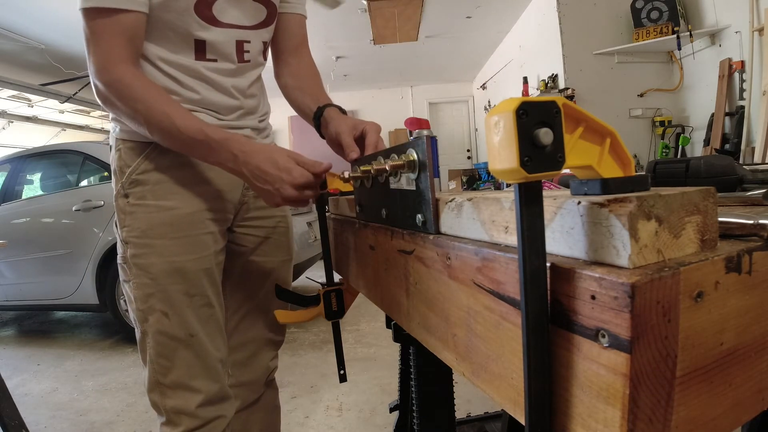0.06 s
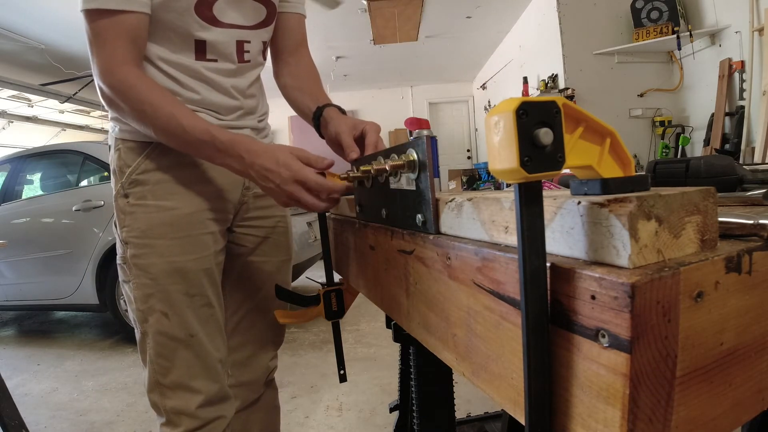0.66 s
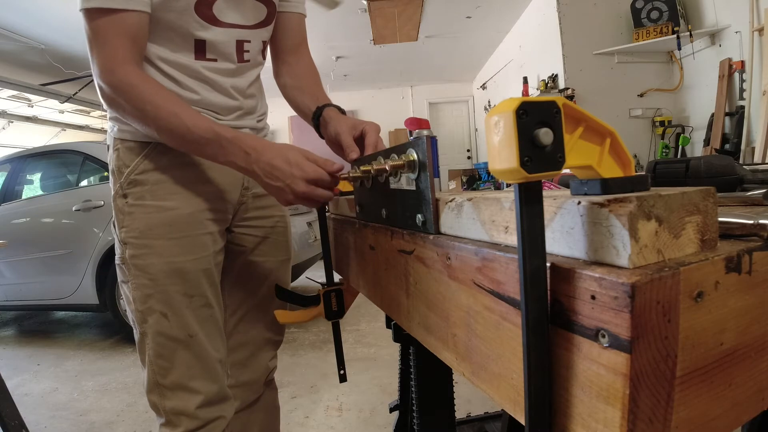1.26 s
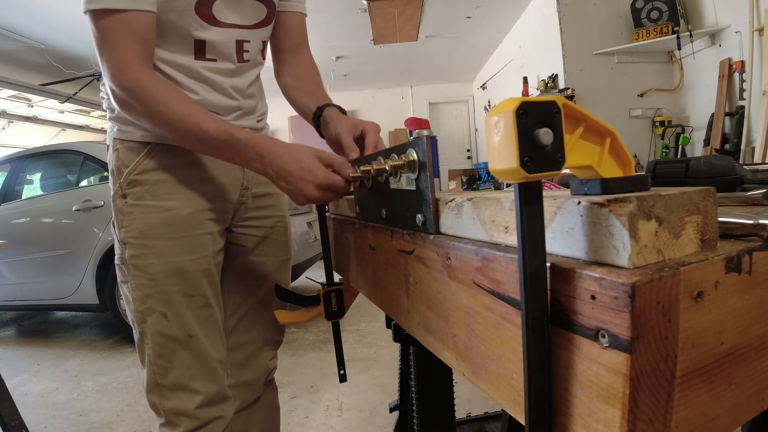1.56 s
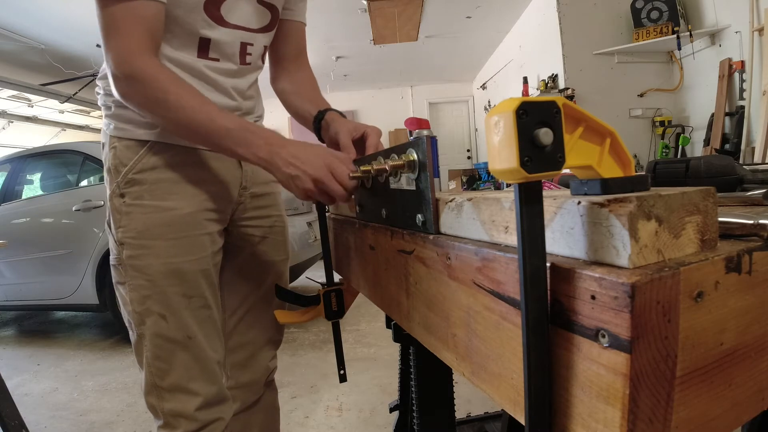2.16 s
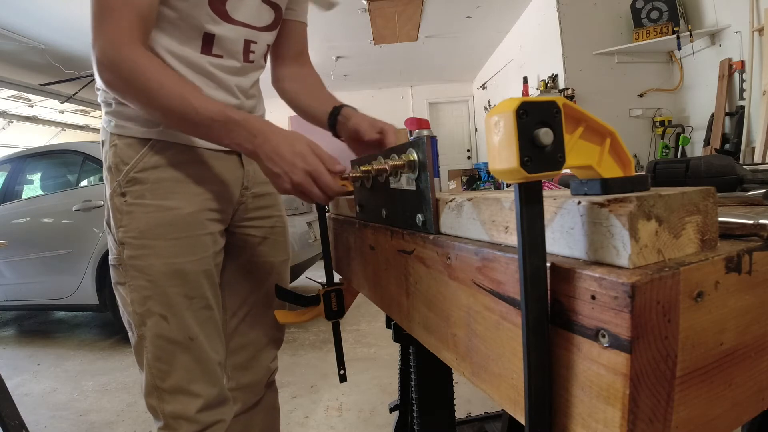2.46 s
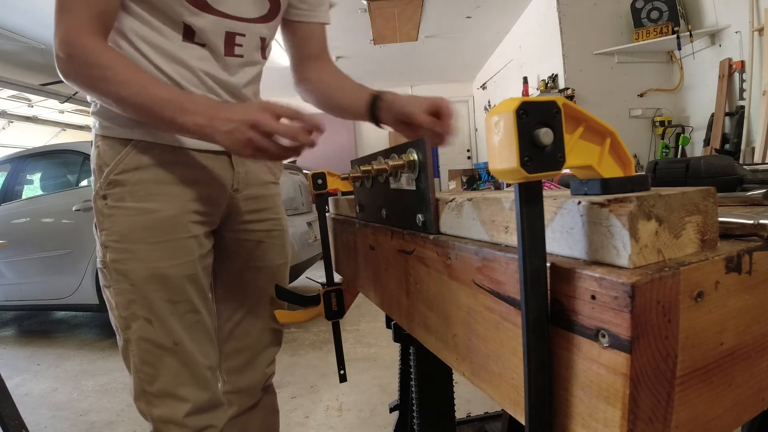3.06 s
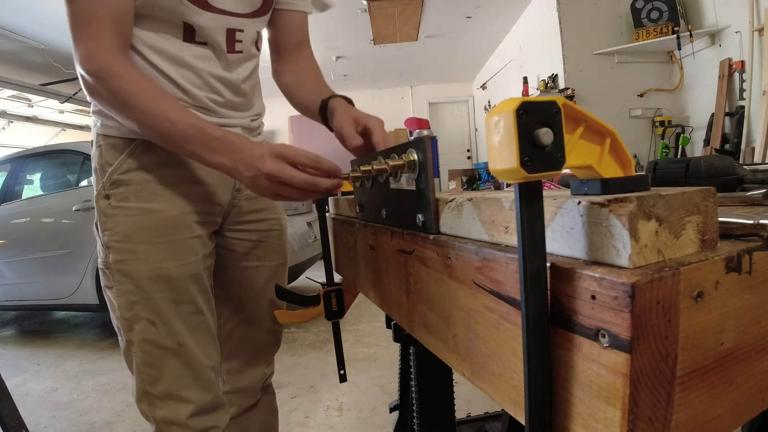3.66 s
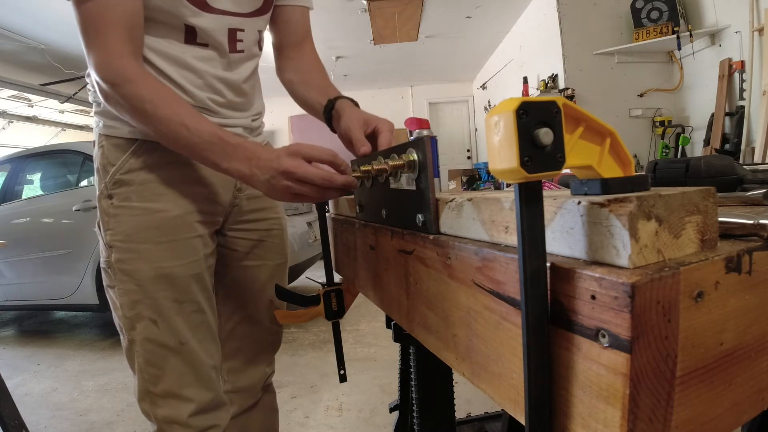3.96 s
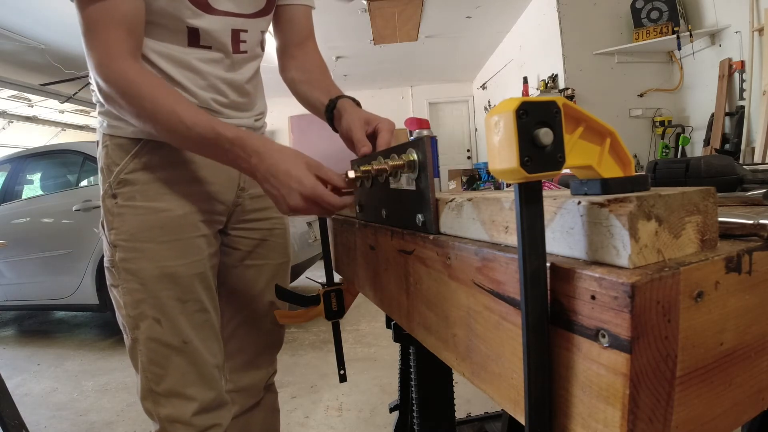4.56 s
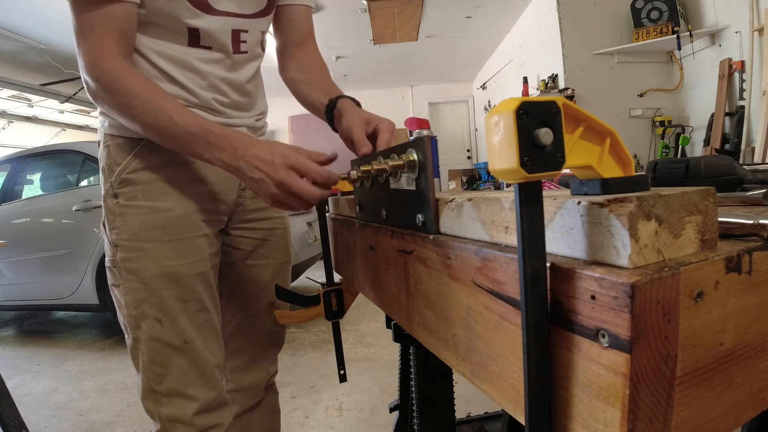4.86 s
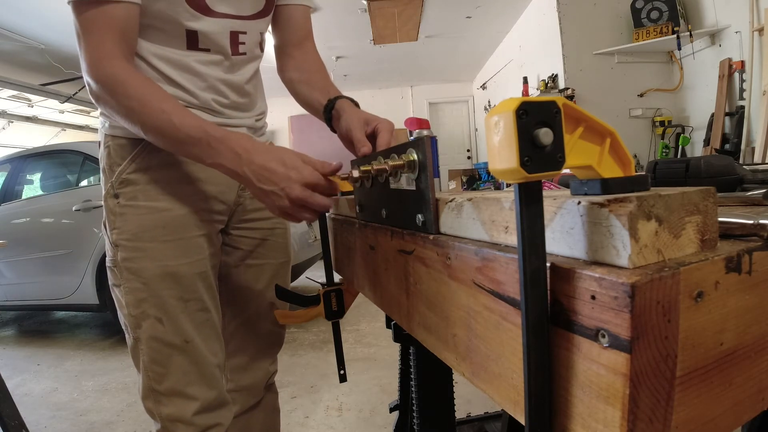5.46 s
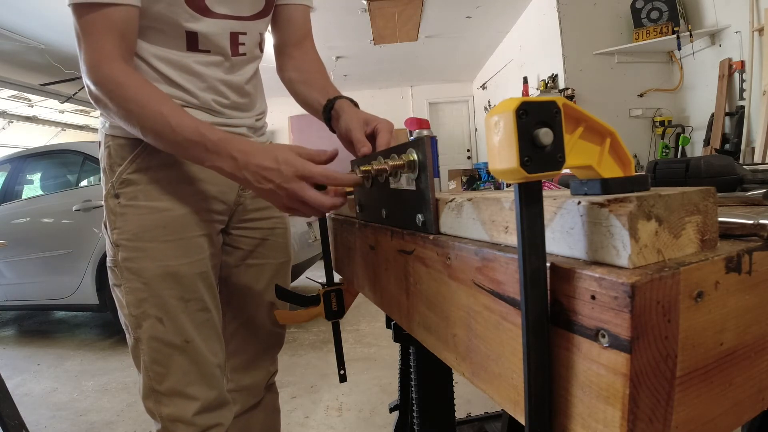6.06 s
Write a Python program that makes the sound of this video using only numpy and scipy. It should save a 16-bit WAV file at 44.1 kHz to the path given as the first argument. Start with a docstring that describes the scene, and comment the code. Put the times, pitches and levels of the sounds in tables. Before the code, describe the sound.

From the start, a bolt is turned by hand in a steel plate clamped to a wooden bench. About four twists a second each bring a click, a scrape of threads and a bouncing, ringing rattle, while a loose washer jingles high above. This thins out after 1.6 seconds. From about 2 to 2.8 seconds a low hum swells softly and sleeves rustle. Around 2.9 seconds a nut knocks dully and slides as it is picked off the bench, followed by a few faint tinks. Light clicks and scrapes start on a second bolt near 3.9 seconds. From 4.8 seconds until the end, at about 6.4 seconds, it clacks and rattles loudly with each twist, ringing the plate and thumping slightly through the bench. Everything is close, with the short echo of a bare-walled garage over faint room tone.

```python
"""Bolts in a steel plate

Bolts with loose washers are turned by hand in a steel plate clamped to a wooden garage bench.
Each twist opens with a click, the threads scrape, and the bolt knocks and bounces in its hole,
ringing the plate; one washer keeps jingling. Between the two bolts a low hum swells, sleeves
rustle and a nut is picked off the bench. Bare walls ring on."""
import sys
import numpy as np
from scipy import signal
from scipy.fft import rfft, irfft
from scipy.io import wavfile
from scipy.ndimage import uniform_filter1d

SR = 44100
rng = np.random.default_rng(int(sys.argv[2]) if len(sys.argv) > 2 else 0)


def int16_out(signal):
    """Quantize to a 16-bit WAV file."""
    q = np.round(np.clip(np.atleast_2d(signal).T, -1, 1) * 32767)
    wavfile.write(sys.argv[1], SR, q.astype(np.int16))


N = 277785
T = np.arange(N) / SR
SECOND_BOLT_S = 3.0  # the hands move on to the second bolt


def undb(db):
    """Decibels to gain."""
    return 10 ** (np.asarray(db) / 20)


def unit(x):
    """Scale to rms 1."""
    return x / np.sqrt(np.mean(x ** 2) + 1e-20)


def fade(t, t60):
    """Exponential decay, 60 dB down after t60 seconds."""
    return np.exp(-np.log(1000) * t / t60)


def over_hz(points, hz):
    """Read (Hz, value) points on a log-frequency axis."""
    f, value = np.transpose(points)
    return np.interp(np.log(hz + 1e-3), np.log(f), value)


def add(track, s, sound):
    """Mix a sound into the track at time s."""
    i = max(int(s * SR), 0)
    track[i:i + len(sound)] += sound[:N - i]


def convolve(x, response):
    """Play x through an impulse response."""
    return signal.fftconvolve(x, response)[:len(x)]


def cut(x, hz, kind, order=2):
    """Low-pass or high-pass."""
    return signal.sosfilt(signal.butter(order, min(hz, .45 * SR), kind, fs=SR, output="sos"), x)


def wobble(hz):
    """Random modulation of rms 1, rolling off above hz."""
    return unit(cut(rng.standard_normal(N), hz, "low"))


def swells(rows, attack_s, t60):
    """Envelope of (start, end, dB) gestures: each rises, holds and dies away."""
    return sum(undb(db) * (1 - np.exp(-np.maximum(T - start, 0) / attack_s)) ** 2
               * fade(np.maximum(T - end, 0), t60) for start, end, db in rows)


def colour(points, size=2048):
    """Minimum-phase response of unit energy from a (Hz, dB) EQ curve."""
    gain = undb(over_hz(points, np.fft.rfftfreq(size, 1 / SR)))
    cepstrum = irfft(np.log(gain))
    cepstrum[1:size // 2] *= 2
    cepstrum[size // 2 + 1:] = 0
    response = irfft(np.exp(rfft(cepstrum)))
    return response / np.linalg.norm(response)


def modes(table, size=16384):
    """Ring of unit energy from (Hz, width, dB) resonances."""
    t = T[:size]
    ring = sum(undb(db) * width * np.exp(-np.pi * width * t) * np.cos(2 * np.pi * hz * t)
               for hz, width, db in table)
    return ring / np.linalg.norm(ring)


def slips(per_s, spread_db):
    """Stick-slip friction: tiny impacts at random times."""
    sizes = undb(spread_db * np.clip(rng.standard_normal(N), -2, 2)) * rng.choice([-1, 1], N)
    return unit(sizes * (rng.random(N) < per_s / SR))


def contact(t60, chatter, size=1024):
    """One blow of unit energy: a first touch, then fast dying chatter."""
    push = rng.standard_normal(size) * fade(T[:size], t60)
    push *= chatter / np.linalg.norm(push)
    push[0] += 1
    return push / np.linalg.norm(push)


def contact_point(shape, patchy_db):
    """Every point of contact favours other resonances around a general (Hz, dB) shape."""
    hz = np.geomspace(400, 17000, 40)
    favour = over_hz(shape, hz) + patchy_db * np.clip(rng.standard_normal(len(hz)), -2, 2)
    return colour(np.column_stack([hz, favour]), size=512)


# room tone EQ: (frequency [Hz], relative level [dB])
AIR_EQ = [(12, -50.5), (20, -10.5), (84, -7.5), (124, -12.5), (139, -17), (270, -23.5), (693, -27),
          (1680, -30), (1830, -31.5), (4080, -39.5), (15000, -49)]


def still_air(level_db=-49.5):
    """A faint, dark bed of noise."""
    return undb(level_db) * convolve(rng.standard_normal(N), colour(AIR_EQ, size=8192))


# reverb decay of the garage: (frequency [Hz], t60 [s])
WALL_DECAY = [(100, 0.57), (700, 0.45), (2000, 0.44), (5000, 0.52), (13000, 0.24)]


def garage(x, wet_db, build_s=0.0016, predelay_s=0.00024):
    """Bare walls return a dense tail that dies soonest in the top octave."""
    t = T[:SR * 3 // 4]
    hz, noise = np.fft.rfftfreq(len(t), 1 / SR), rfft(rng.standard_normal(len(t)))
    tail = 0
    for centre, t60 in WALL_DECAY:
        band = over_hz([(f, f == centre) for f, _ in WALL_DECAY], hz)
        tail += irfft(noise * band, len(t)) * fade(t, t60)
    tail *= 1 - np.exp(-np.maximum(t - predelay_s, 0) / build_s)
    return x + undb(wet_db) * convolve(x, tail / np.linalg.norm(tail))


# swells of the low hum: (start [s], end [s], relative level [dB])
HUM_SWELLS = [(1.95, 2.15, -55), (2.185, 2.36, -34), (2.395, 2.52, -32), (2.655, 2.755, -39)]


def hum(hz=64.6, gain_db=5, waver=0.029, overtone_db=-27):
    """A nearly pure low tone comes and goes, wavering a little in pitch."""
    phase = 2 * np.pi * np.cumsum(hz * (1 + waver * wobble(hz=5.1))) / SR
    tone = np.sqrt(2) * (np.sin(phase) + undb(overtone_db) * np.sin(2 * phase))
    return undb(gain_db) * swells(HUM_SWELLS, attack_s=0.013, t60=0.12) * tone


# moves of hands and sleeves: (start [s], end [s], relative level [dB])
RUSTLE_MOVES = [(1.99, 2.1, -53), (2.19, 2.52, -45.5), (2.67, 2.76, -49.5), (3.1, 3.2, -60)]
# their soft tone: (frequency [Hz], relative level [dB])
RUSTLE_EQ = [(88, -33.5), (150, -2.5), (318, 1), (357, -5.5), (742, -10), (883, -12), (1320, -11),
             (3820, -23), (15000, -32)]


def rustle(gain_db=-1):
    """Hands and sleeves brush softly; the fingers rub unevenly."""
    pressure = undb(gain_db + 0.59 * wobble(hz=32))
    friction = convolve(slips(per_s=2500, spread_db=0), colour(RUSTLE_EQ))
    return swells(RUSTLE_MOVES, attack_s=0.0055, t60=0.33) * pressure * friction


# nut on the bench: (time [s], relative level [dB], tick offset [dB])
NUT_KNOCKS = [(2.887, -24.5, -24), (2.924, -28, -13), (2.947, -12.5, -35), (2.969, -25, 14.5),
              (3.003, -23.5, -30), (3.037, -28, -19)]
# resonances of the wood: (frequency [Hz], width [Hz], relative level [dB])
WOOD_MODES = [(202, 97, -22), (600, 49, 7), (982, 45, 9), (1050, 70, -20), (1360, 50, -8), (1385, 86, 9.5),
              (2435, 64, 6.5), (2600, 75, -23)]
# fingers push, then drag the nut: (start [s], end [s], level [dB])
NUT_SLIDES = [(2.9, 2.935, -38.5), (2.888, 3.04, -42.5)]
# tone of the drag: (frequency [Hz], relative level [dB])
SLIDE_EQ = [(59, -28), (100, 4.5), (192, -2), (383, -20), (780, -10), (1050, -2.5), (1880, -7.5),
            (2270, -1.5), (4090, -17.5), (9260, -15.5), (15000, -42)]


def nut(knock_db=16, tick_db=2):
    """A nut knocks and slides as it is picked up; wood gives way, so the knock is dull."""
    taps, ticks = np.zeros(N), np.zeros(N)
    for s, db, treble in NUT_KNOCKS:
        add(taps, s, undb(db + knock_db) * contact(t60=0.0039, chatter=0.19))
        add(ticks, s, undb(db + treble + tick_db) * contact(t60=0.0096, chatter=2.2))
    knocks = cut(convolve(taps, modes(WOOD_MODES)), 3200, "low", order=4)
    ticks = cut(cut(ticks, 2000, "high"), 10300, "low")
    friction = convolve(slips(per_s=9000, spread_db=4.5), colour(SLIDE_EQ))
    return knocks + ticks + swells(NUT_SLIDES, attack_s=0.0055, t60=.12) * friction


# light touches of small parts: (time [s], pitch [Hz], relative level [dB], t60 [s])
PART_TINKS = [(2.41, 5290, -60.5, 0.42), (3.128, 6600, -56.5, 0.47), (3.232, 4900, -57.5, 0.44),
              (3.77, 5150, -58.5, 0.9), (3.879, 10500, -59.5, 0.2), (4.005, 9250, -41.5, 0.026)]


def tinks(gain_db=-8, spread=0.083, attack_s=0.0017):
    """Small parts ring in close clusters of high partials."""
    out, t = np.zeros(N), T[:SR // 2]
    for s, hz, db, t60 in PART_TINKS:
        partials = hz * (1 + spread * rng.standard_normal(12))
        cluster = sum(np.sin(2 * np.pi * (f * t + rng.random())) for f in partials)
        add(out, s, undb(db + gain_db) * fade(t, t60) * (1 - np.exp(-t / attack_s)) * cluster)
    return out


# the washer's ring: (frequency [Hz], width [Hz], relative level [dB])
WASHER_MODES = [(8790, 14, 0), (8828, 14, 0)]
# the washer is shaken: (start [s], end [s], relative level [dB])
WASHER_SHAKES = [(.078, .2, -52), (.359, .37, -47), (.566, .655, -18), (.8, 1.0, -27.5),
                 (1.083, 1.125, -21.5), (1.298, 1.37, -26.5), (1.555, 1.57, -32)]


def washer(gain_db=-9):
    """A loose washer chatters on its bolt and rings with two beating modes."""
    ring = convolve(slips(per_s=560, spread_db=2), modes(WASHER_MODES))
    # even out the ring: with little play, the washer follows the shaking closely
    swing = np.sqrt(np.abs(uniform_filter1d(ring ** 2, size=2200)) + 1e-3)
    return undb(gain_db) * swells(WASHER_SHAKES, attack_s=0.0017, t60=0.48) * ring / swing


# twists of a bolt, levels relative: (start [s], end [s], click [dB], scrape [dB], scrape swell [dB])
TWIST_CUES = [(0, 0.059, -26, -33.5, -11), (.078, 0.319, -5, -26.5, -6.5), (.322, 0.379, -1, -25, 9),
              (.564, 0.651, -16, -25.5, -9), (0.795, 1.047, -0.5, -31.5, -18),
              (1.048, 1.143, -4, -22.5, 10), (1.295, 1.373, -9, -25, -4.5), (1.53, 1.68, -11.5, -29.5, 4.5),
              (1.868, 1.987, -20.5, -33.5, 6.5), (3.879, 4.012, -18, -42.5, 22.5),
              (4.146, 4.258, -24, -45, -5), (4.32, 4.531, -29.5, -34, 16),
              (4.604, 4.692, -24, -33.5, -11.5), (4.793, 4.852, -22, -31.5, 10),
              (4.852, 4.97, -32, -29, -6.5), (5.063, 5.1, -12, -27.5, -1), (5.277, 5.434, -15, -31, -5),
              (5.512, 5.602, -12.5, -24, 2), (5.739, 5.813, -3, -23.5, 8), (5.968, 6.128, -9, -28.5, -6),
              (6.18, 6.296, -5.5, -32.5, -22)]


def scrapes(gain_db=-6, catch_db=2.5, firm_db=-28):
    """Threads grind, catching and letting go many times in each twist; firm twists are brighter."""
    catches = unit(undb(catch_db * np.clip(wobble(hz=110), -2, 2)))
    grind = catches * slips(per_s=2500, spread_db=2)
    force = np.zeros(N)
    for start, end, _, db, swell in TWIST_CUES:
        squeak_db = 7 if start < SECOND_BOLT_S else -1
        bright_db = 0.27 * max(db - firm_db, 0)
        shape = [(5000, 0), (5750, squeak_db), (6600, bright_db - 5), (14000, bright_db - 12)]
        stroke = grind[int(start * SR):int(end * SR)]
        stroke = unit(signal.fftconvolve(stroke, contact_point(shape, patchy_db=3)))
        ramp_db = swell * np.linspace(-.5, .5, len(stroke))
        add(force, start, stroke * undb(gain_db + db + ramp_db))
    return cut(force, 250, "high")  # too light to shake the bench


# bolt against its hole: (time [s], relative level [dB], bounce length [s], relative treble [dB])
BOLT_KNOCKS = [(0.09, -9, .04, -38), (0.343, -0.5, .002, -26), (.359, 2.5, .006, -11),
               (0.569, -1.5, .014, -3.5), (0.616, -3.5, .003, -9), (0.631, -3, 0.017, -7.5),
               (.810, 2, .004, -2.5), (0.847, 2.5, 0.0016, -17), (0.898, -6.5, 0.0012, -55),
               (0.946, -7, 0.0091, -31), (1.007, -5, .002, -42), (1.083, -12, .002, 4),
               (1.093, -4.5, .009, -19), (1.12, 3, .006, -5), (1.344, 3.5, .007, -14.5),
               (1.359, -6, .002, -6), (1.549, -21, 0.0093, -36), (1.629, -13.5, .012, -37),
               (2.148, -28.5, 0.0026, -57), (2.213, -31, .014, -40), (3.767, -29, 0.0024, -36),
               (4.513, -15, .016, -40), (4.81, -4.5, .004, -16), (4.824, -3.5, .005, -11),
               (4.838, -4, .002, -25), (5.075, -4, .012, -7.5), (5.312, 3, 0.021, -4.5),
               (5.54, -6.5, .002, -12), (5.563, 2, 0.018, -6.5), (5.77, 1, 0.028, -5),
               (5.985, -4, 0.011, -5.5), (6.052, -4, 0.0016, -44), (6.099, 1, .016, -6),
               (6.189, -9, .003, -6)]


def blows(gap_s=.0066, scatter=.25, loss_db=0.74, full_rattle_s=0.015, click_treble_db=-28.5):
    """Cue list (s, dB, treble dB) of dull grip clicks, knocks and their weakening bounces."""
    hits = [(start, click, click_treble_db) for start, _, click, _, _ in TWIST_CUES]
    for s, db, lasts, treble in BOLT_KNOCKS:
        hits.append((s, db, treble))
        if lasts > gap_s:  # a lighter touch leads into a long rattle
            lead_db = -10 + 20 * np.log10(min(lasts / full_rattle_s, 1))
            hits.append((s - gap_s, db + lead_db, treble))
        gaps = gap_s * (1 + scatter * rng.uniform(-1, 1, 6))
        for k, delay in enumerate(np.cumsum(gaps), 1):
            share = min(lasts / gap_s - k + .5, 1)  # the last bounce is only partial
            if share > 0:
                hits.append((s + delay, db - k * loss_db + 20 * np.log10(share), treble))
    return hits


def clacks(body, hits, gain_db=8, attack_s=0.00027):
    """The bolt hits the side of its hole; hard contacts are bright, light ones are rounder."""
    force = np.zeros(N)
    for s, db, treble in hits:
        bass_db, top_db = -5 - 0.42 * db, treble + 18
        shape = [(700, bass_db), (1600, 0), (3800, 0), (6500, top_db / 2), (11000, top_db)]
        push = contact(t60=0.04 * undb(0.077 * db), chatter=3)  # strong blows chatter for longer
        push *= 1 - np.exp(-T[:len(push)] / attack_s)
        push = convolve(push, contact_point(shape, patchy_db=4.5))
        # each blow is levelled by the midrange ring it draws from the body
        mids = cut(cut(signal.fftconvolve(push, body), 1500, "high"), 4500, "low")
        add(force, s, undb(db + gain_db) * push / np.linalg.norm(mids))
    return force


# boom of the bench: (frequency [Hz], relative level [dB], t60 [s])
BENCH_MODES = [(136.9, -2.5, .28), (304, -3.5, .12), (405.3, -4, 0.23)]


def thumps(first_db=-29, second_db=-27, tight_s=5.3, grip_db_per_s=49, attack_s=0.0048, detune=.01):
    """Heavy, hard knocks boom through the clamp into the bench, more so as the second bolt tightens."""
    out, t = np.zeros(N), T[:SR // 2]
    for s, db, _, treble in BOLT_KNOCKS:
        slack_db = grip_db_per_s * max(tight_s - s, 0)
        grip_db = first_db if s < SECOND_BOLT_S else second_db - slack_db
        boom = 0
        for hz, mode_db, t60 in BENCH_MODES:
            pitch = hz * (1 + detune * rng.standard_normal())
            boom += undb(mode_db) * fade(t, t60) * np.sin(2 * np.pi * pitch * t)
        add(out, s, undb(grip_db + db + 0.2 * treble) * (1 - np.exp(-t / attack_s)) * boom)
    return out


# ring of the clamped plate with its bolts: (frequency [Hz], width [Hz], relative level [dB])
PLATE_MODES = [(337, 42, -8), (393.3, 19, 5), (473.5, 48, -2), (667, 100, -4), (780, 170, -3.5),
               (1096, 23, 3), (1314, 54, -7), (1420, 24, -5.5), (1580, 90, -13.5), (1923, 84, -3.5),
               (1867, 11, -7.5), (2153, 6.5, 0.5), (2600, 27, -5), (2290, 14, -18), (2430, 43, -4.5),
               (2830, 40, 0), (2890, 22, -19), (2760, 21, -4), (3070, 170, -6.5), (3010, 150, -30.5),
               (3180, 7.5, -8), (3090, 76, -2.5), (3500, 70, 5.5), (4914, 66, -9.5), (5350, 19, -24.5),
               (7900, 45, -10.5)]


def in_plate(bolt_eq, ring_db=-7):
    """Response of a bolt together with the plate that it sits in."""
    body = undb(ring_db) * cut(modes(PLATE_MODES), 8000, "low", order=3)
    add(body, 0, colour(bolt_eq))
    return body / np.linalg.norm(body)


# dense, quickly damped ring of each bolt in its hole: (frequency [Hz], relative level [dB])
FIRST_BOLT_EQ = [(40, -16), (130, -16), (240, -29), (380, -7.5), (800, -13), (1200, -7), (1800, -12),
                 (2700, 3), (3500, 0.5), (4050, -14.5), (5700, -26), (6800, -25.5), (10000, -27),
                 (16000, -40.5)]
SECOND_BOLT_EQ = [(40, -64), (130, 8), (220, -27), (350, -7.5), (950, -9), (1350, 0.5), (1700, -7.5),
                  (2800, 1.5), (3450, 2), (4050, -21), (6500, -26), (10800, -26.5), (13000, -34.5),
                  (16000, -47.5)]


def bolts():
    """Blows and scraping ring the bolt being turned and, through it, the plate and bench."""
    first, second = in_plate(FIRST_BOLT_EQ), in_plate(SECOND_BOLT_EQ)
    hits = blows()
    force = scrapes() + clacks(first, hits)
    on_first = T < SECOND_BOLT_S
    return convolve(force * on_first, first) + convolve(force * ~on_first, second) + thumps()


def scene():
    """Mono mix: the hardware in the garage, over hum, rustle and still air."""
    bed = rustle() + still_air()
    steel = garage(bolts() + washer() + tinks(), wet_db=-5)
    close_nut = garage(nut(), wet_db=-10)  # close up, so drier than the plate
    return (bed + steel + close_nut + hum())[None]


def suppress(x, threshold_db=-36, slope=0.46, depth_db=7):
    """Noise suppressor: ducks the sound as its level above the bass sinks under a threshold."""
    power = uniform_filter1d(cut(x, 300, "high") ** 2, size=700)
    level_db = 10 * np.log10(np.abs(power) + 1e-12)
    return x * undb(np.clip(slope * (level_db - threshold_db), -depth_db, 0))


def record(dry, top_hz=15900):
    """Output chain: suppress quiet noise, round the highest peaks, cut the top."""
    low_pass = signal.ellip(10, .2, 70, top_hz, fs=SR, output="sos")
    return signal.sosfilt(low_pass, np.tanh(suppress(dry)))


dry = scene()
out = record(dry)
int16_out(out)
```